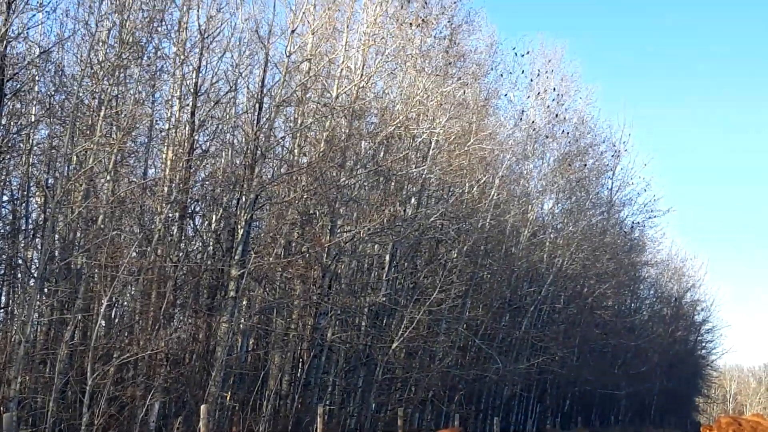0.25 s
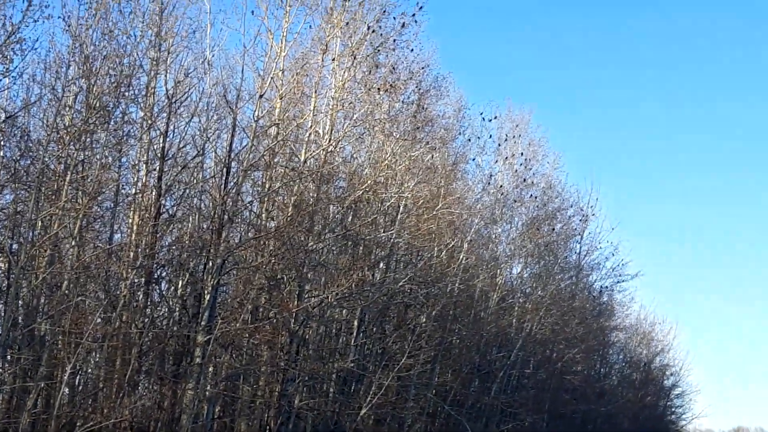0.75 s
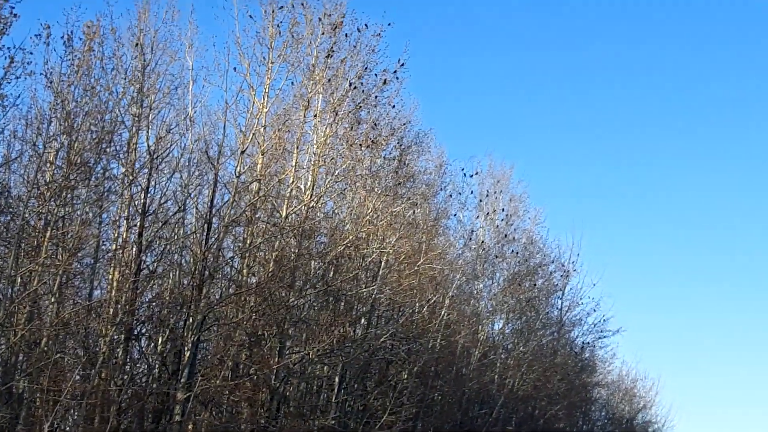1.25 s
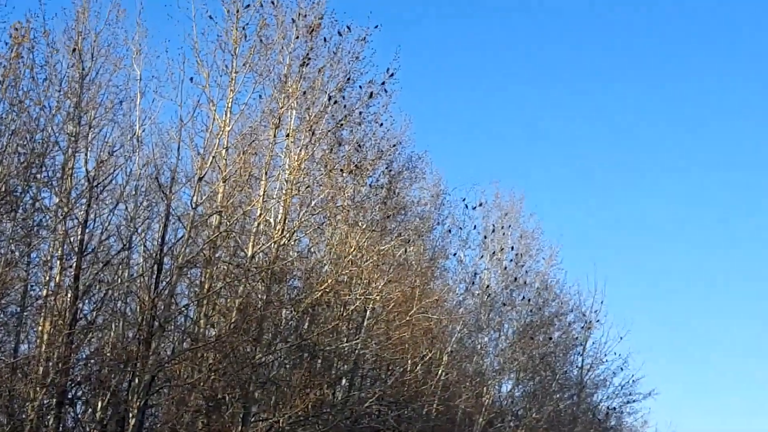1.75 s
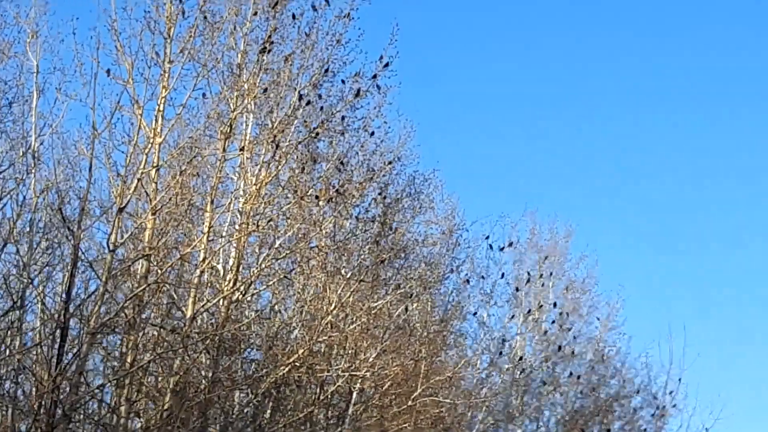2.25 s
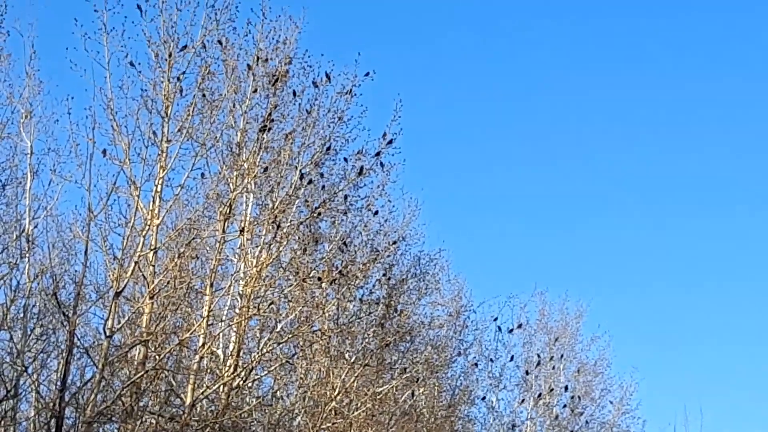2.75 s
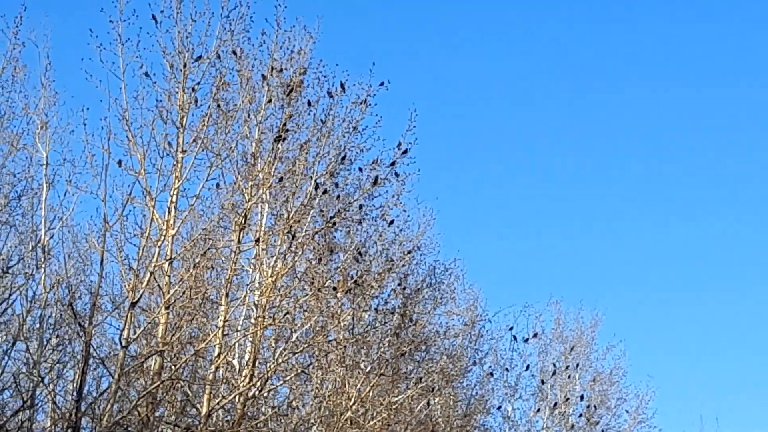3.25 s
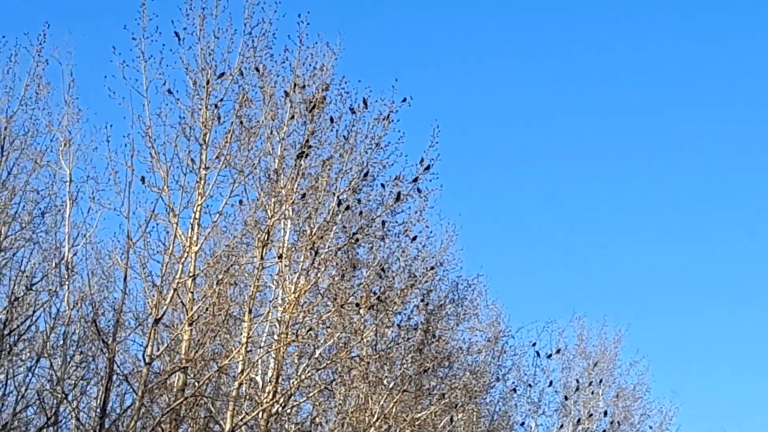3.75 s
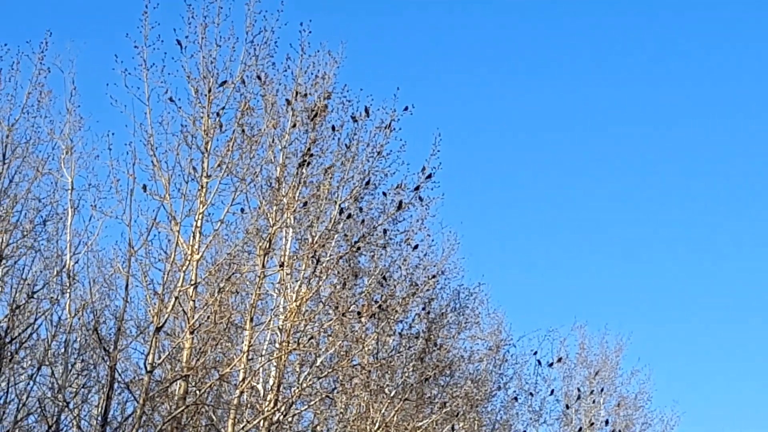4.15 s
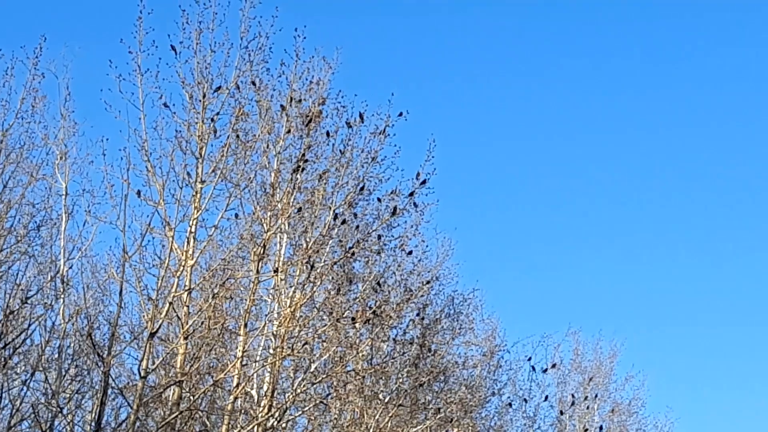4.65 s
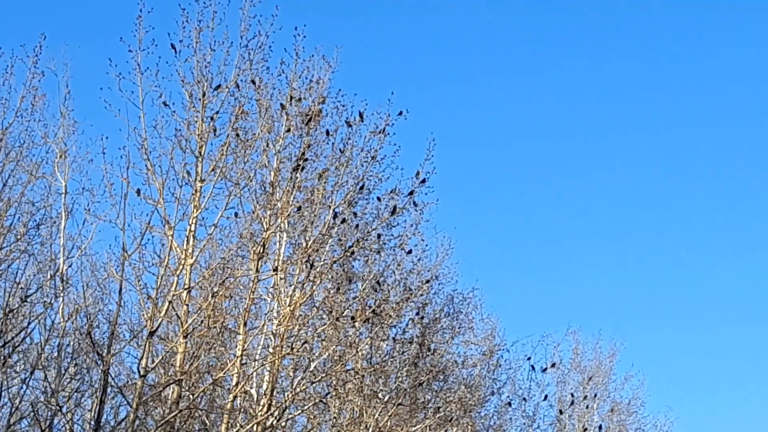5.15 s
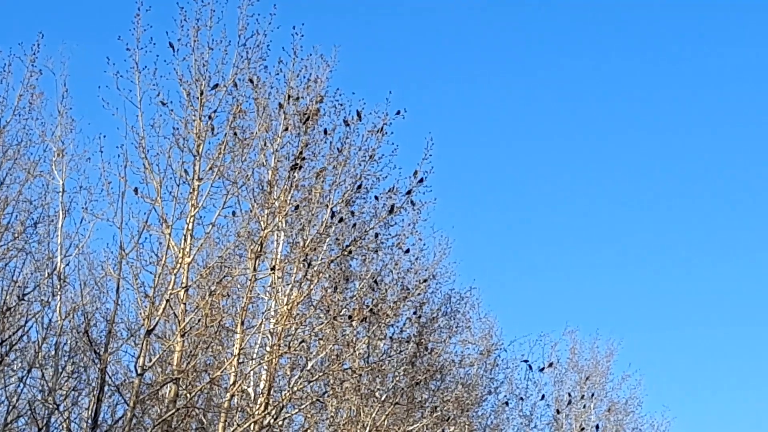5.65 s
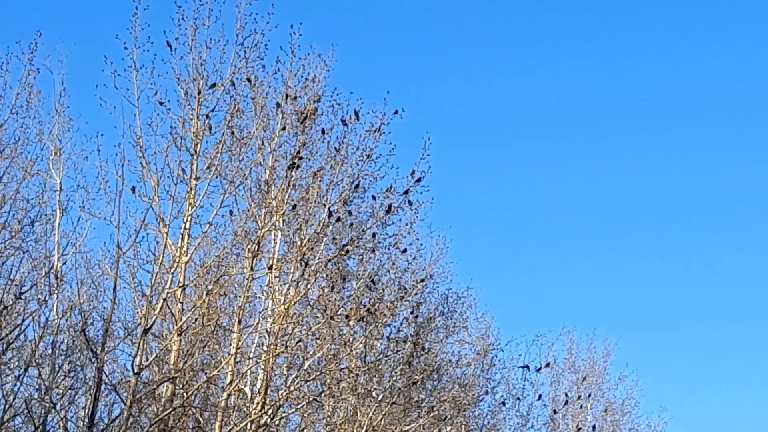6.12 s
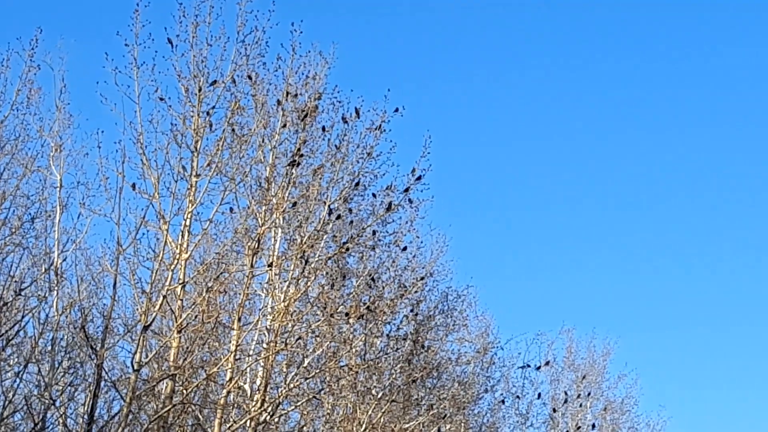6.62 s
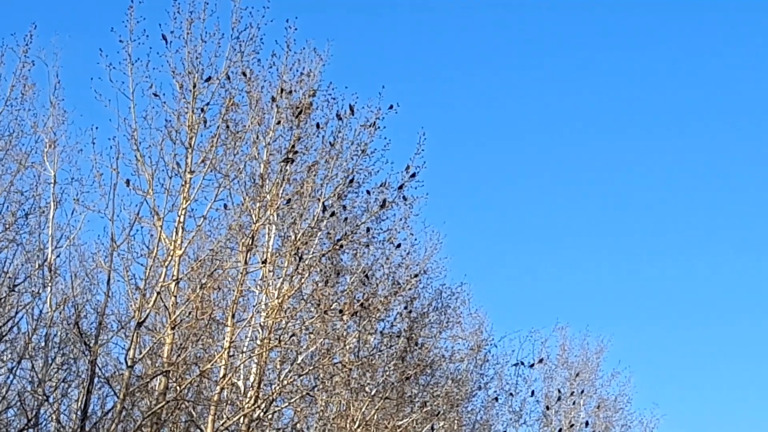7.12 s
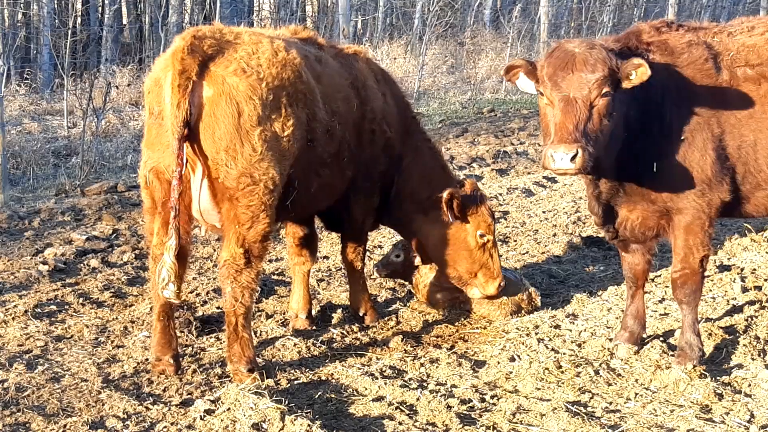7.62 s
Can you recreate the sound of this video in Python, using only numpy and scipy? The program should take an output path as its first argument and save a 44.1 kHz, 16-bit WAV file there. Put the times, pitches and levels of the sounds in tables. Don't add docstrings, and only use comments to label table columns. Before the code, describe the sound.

A large flock of blackbirds whistles, chips, chatters and trills from bare treetops, with light wind and small handling knocks, then dips into a quieter ending.

```python
import sys
import numpy as np
from scipy import signal
from scipy.fft import rfft, irfft
from scipy.io import wavfile
from scipy.ndimage import uniform_filter1d

SR = 44100
rng = np.random.default_rng(int(sys.argv[2]) if len(sys.argv) > 2 else 0)


def gain_from_db(level_db):
    decades = np.asarray(level_db, float) / 20
    return 10 ** decades


def master_out(mix):
    frames = np.transpose(np.atleast_2d(mix))
    ceiling = np.clip(frames, -1, 1)
    pcm = np.round(ceiling * 32767).astype(np.int16)
    wavfile.write(sys.argv[1], SR, pcm)


N = 347508


def evened(x):
    return x / np.sqrt(np.mean(x ** 2) + 1e-20)


def read(points, hz):
    f, value = np.transpose(points)
    return np.interp(np.log(hz + 1), np.log(f + 1), value)


def colour(x, points):
    gain = gain_from_db(read(points, np.fft.rfftfreq(x.shape[-1], 1 / SR)))
    return irfft(rfft(x) * gain, x.shape[-1])


def curve(rows, column, t):
    rows = np.asarray(rows)
    return np.interp(t, rows[:, 0], rows[:, column])


def add(mix, start_s, sound):
    part = mix[..., max(round(start_s * SR), 0):][..., :sound.shape[-1]]
    part += sound[..., :part.shape[-1]]


def wander(size, smooth_s):
    span = max(int(smooth_s * SR), 2)
    noise = rng.standard_normal(size + 4 * span)
    smooth = uniform_filter1d(uniform_filter1d(noise, span), span)
    return evened(smooth)[2 * span:-2 * span]


def sing(hz, db, taper, harsh_hz=0, flutter_db=3.2, waver_hz=18):
    size = len(hz)
    shaken_hz = hz + waver_hz * wander(size, .006) + harsh_hz * wander(size, .0006)
    turn = 2 * np.pi * np.cumsum(shaken_hz) / SR
    flutter = flutter_db * (1.67 * np.tanh(wander(size, .005)) - 0.81)
    flutter *= min(size / 4000, 1)
    shape = np.sqrt(2) * gain_from_db(db + flutter) * signal.windows.tukey(size, np.clip(taper, 0, 1))
    shift, tilt = rng.random(2)
    left_turn = turn + (hz.mean() - 4000) / 1200 + 3.2 * (shift - .5)
    return shape * np.array([gain_from_db(8 * (tilt - .5)) * np.sin(left_turn), np.sin(turn)])


# start_s, length_s, first_pitch_hz, last_pitch_hz, top_level_db
LEAD_WHISTLES = [(0.478, 0.27, 4344, 4430, -42.5), (1.428, 0.2, 4144, 4410, -37.5),
                 (1.541, 0.13, 4450, 4690, -38.5), (1.63, 0.105, 4480, 4550, -36),
                 (1.691, 0.2, 4613, 4610, -37), (2.188, 0.047, 4280, 4340, -37),
                 (2.258, 0.15, 4430, 4730, -47), (2.622, 0.12, 4580, 4510, -43.5),
                 (2.866, 0.13, 4330, 4475, -46), (3.176, 0.082, 4270, 4520, -33),
                 (3.255, .04, 4440, 4430, -39.5), (3.379, 0.17, 4400, 4273, -41.5),
                 (3.535, 0.18, 4430, 4506, -34.5), (4.051, 0.24, 4388, 4354, -34.5),
                 (4.723, 0.19, 4600, 4600, -52), (4.788, 0.23, 4370, 4615, -38),
                 (4.806, 0.24, 4145, 4460, -41.5), (4.965, 0.16, 4640, 4470, -42),
                 (5.342, .3, 4240, 4370, -39.5), (5.57, 0.19, 4490, 4676, -42.5),
                 (5.976, 0.073, 4280, 4485, -32.5), (6.048, 0.21, 4510, 4510, -41.5),
                 (6.904, 0.16, 4263, 4404, -41.5), (7.048, 0.099, 4414, 4480, -34),
                 (7.093, 0.2, 4260, 4470, -41), (7.173, 0.24, 4596, 4735, -40)]
# start_s, length_s, first_pitch_hz, last_pitch_hz, top_level_db
VOICE_SLURS = [(0.0, 0.052, 5370, 5000, -46), (0.522, 0.11, 1970, 1970, -51), (1.731, 0.2, 4200, 4200, -47),
               (6.478, 0.034, 4360, 4050, -41), (3.632, 0.093, 3570, 3640, -39.5),
               (3.721, 0.18, 4360, 4446, -53), (3.802, 0.17, 5300, 4900, -52),
               (4.563, 0.13, 3380, 3190, -51.5), (5.121, 0.068, 4900, 4300, -44.5),
               (5.268, 0.14, 5060, 4930, -46.5), (5.473, 0.071, 1650, 1640, -59),
               (5.598, 0.17, 4800, 4300, -52), (5.758, .02, 3700, 3620, -44),
               (6.8, 0.019, 4150, 3600, -47.5), (5.853, 0.11, 5200, 4720, -44),
               (5.926, 0.049, 3190, 2860, -50), (6.162, .16, 2290, 2220, -49),
               (6.315, 0.058, 3230, 3400, -45.5), (6.408, 0.05, 2035, 2120, -59.5),
               (6.548, 0.12, 5530, 5200, -51), (6.63, 0.15, 4900, 4900, -49.5),
               (6.641, .151, 5271, 5091, -42.5), (7.701, .151, 1591, 1591, -61.5),
               (3, .12, 4450, 4560, -49.5), (3.5, 0.085, 5700, 4900, -49), (1.61, .07, 6250, 6450, -56),
               (6.78, 0.028, 5080, 4700, -45), (5.5, .09, 2900, 2980, -54), (4.485, .04, 5300, 4800, -53),
               (4.74, 0.025, 5550, 6400, -57), (5.48, 0.078, 6350, 6200, -59), (5.5, .022, 4500, 4900, -43),
               (0.8, 0.12, 4420, 4400, -50), (4.5, 0.076, 4590, 4590, -50), (5, .07, 5150, 5300, -54)]
SWELL_DB, GLIDE_BEND, WHISTLE_EDGE = -5, .9, 0.12


def whistles():
    out = np.zeros((2, N))
    for start_s, length_s, first_hz, last_hz, db in [*LEAD_WHISTLES, *VOICE_SLURS]:
        u = np.linspace(0, 1, int(length_s * SR))
        glide_hz = first_hz + (last_hz - first_hz) * u ** GLIDE_BEND
        swell_db = SWELL_DB * (2 * u - 1) ** 2
        add(out, start_s, sing(glide_hz, db + swell_db, WHISTLE_EDGE, flutter_db=2.2))
    return out


# start_s, length_s, first_pitch_hz, last_pitch_hz, top_level_db
HUSKY_SLURS = [(2.04, .15, 4420, 4330, -42.5), (2.07, .15, 4680, 4630, -43.5), (2.12, .09, 3580, 3450, -46),
               (2.32, 0.036, 2294, 2100, -43.5), (2.36, 0.091, 2160, 2210, -54),
               (5.77, 0.1, 5270, 6240, -58), (5.859, 0.092, 6250, 6340, -52.5),
               (6.791, 0.12, 4900, 4850, -50), (7.455, 0.14, 2770, 2640, -61), (7.72, .16, 4620, 4650, -62),
               (7.74, .05, 4950, 5050, -60), (3.63, .05, 3300, 3050, -49), (3.69, 0.044, 2900, 3050, -51),
               (3.745, .03, 3820, 3430, -43), (6.531, .1, 3550, 3600, -51), (5.68, 0.052, 5450, 5300, -52),
               (5.74, .11, 2300, 2200, -57)]


def husky_slurs():
    out = np.zeros((2, N))
    for start_s, length_s, first_hz, last_hz, db in HUSKY_SLURS:
        glide_hz = np.linspace(first_hz, last_hz, int(length_s * SR))
        add(out, start_s, sing(glide_hz, db, 0.37, flutter_db=5, waver_hz=55))
    return out


# start_s, length_s, pitch_hz, level_db
HELD_NOTES = [(0.552, 0.12, 1680, -59), (0.728, 0.057, 1265, -56), (0.912, 0.056, 1850, -52.5),
              (1.038, 0.07, 3635, -48), (1.457, 0.099, 4470, -46), (1.595, 0.093, 5570, -54.5),
              (1.707, 0.052, 2354, -45.5), (1.823, 0.047, 3366, -41), (1.887, 0.064, 2376, -55),
              (1.968, 0.14, 4885, -44.5), (4.51, 0.11, 5500, -57.5), (2.178, 0.066, 2670, -51),
              (2.39, 0.067, 4500, -34), (3.299, 0.075, 4510, -33.5), (3.388, 0.1, 4770, -46),
              (3.461, 0.068, 4390, -38), (3.571, 0.06, 4250, -40), (3.709, 0.13, 4410, -45),
              (4.006, 0.075, 4300, -43.5), (4.542, 0.14, 4820, -48), (5.221, 0.029, 4700, -43.5),
              (5.377, 0.17, 4383, -38), (5.479, 0.085, 4480, -41.5), (5.668, 0.065, 3290, -48),
              (6.083, 0.071, 4330, -38.5), (1.3, 0.18, 4250, -52), (1.4, 0.079, 5250, -58),
              (1.369, .04, 1760, -56), (1.978, 0.022, 1400, -61), (2.58, .045, 5100, -54),
              (3.94, 0.06, 4300, -42.5), (4.148, 0.051, 1350, -64), (4.3, 0.068, 3030, -54.5),
              (4.419, .04, 3600, -53), (5.545, 0.073, 1720, -56.5), (7.05, 0.11, 4530, -34),
              (7.061, .08, 2150, -62.5), (7.14, 0.1, 2150, -67), (7.24, 0.063, 2660, -60),
              (.595, 0.028, 2500, -49), (0.328, 0.077, 3400, -46)]
# start_s, pitch_hz, level_db
BRIEF_PIPS = [(.015, 4760, -40.5), (.018, 5090, -41), (.05, 3400, -39), (0.468, 2530, -46),
              (.724, 3400, -40), (.742, 2098, -44.5), (1.018, 3466, -39), (1.6, 3970, -40),
              (1.602, 4620, -48), (1.868, 2350, -44.5), (2.453, 4800, -40.5), (2.538, 4120, -46),
              (2.572, 4970, -45), (2.628, 4600, -35.5), (3.061, 4750, -32), (3.204, 4690, -33.5),
              (3.405, 1920, -55), (3.535, 4060, -39), (4.568, 5520, -51), (4.707, 3600, -42),
              (4.747, 4290, -38.5), (5.3, 4366, -38), (5.335, 4440, -36), (6.89, 4930, -42.5),
              (6.94, 4220, -42), (7.625, 3570, -48.5), (.495, 4350, -47), (.64, 4380, -43),
              (2.245, 4400, -35.5), (2.165, 3550, -43.5), (3.185, 2650, -54), (4.305, 2600, -54),
              (3.775, 4750, -44), (4.44, 4700, -46), (4.06, 4900, -48), (6.69, 3230, -52), (7.2, 3500, -53),
              (7.13, 3800, -54.5), (4.888, 4400, -36.5), (7.3, 4660, -41), (5.895, 4330, -40.5),
              (6.11, 3500, -50), (5.858, 6420, -49), (7.82, 5300, -56), (1.24, 4600, -47), (2.3, 4800, -47)]
PIP_S = 0.026


def notes_and_pips():
    out = np.zeros((2, N))
    pips = [(start_s, PIP_S, hz, db) for start_s, hz, db in BRIEF_PIPS]
    for start_s, length_s, hz, db in [*HELD_NOTES, *pips]:
        add(out, start_s, sing(np.full(int(length_s * SR), float(hz)), db, 0.49))
    return out


BURST_T = np.arange(-.012, .012, 1 / SR)
# middle_s, middle_pitch_hz, level_db
FALLING_CHIPS = [(1.893, 4500, -38.5), (2.294, 4010, -42.5), (2.558, 4200, -38.5), (3.574, 3900, -39),
                 (3.722, 4160, -39), (3.99, 3880, -39.5), (4.234, 4010, -39), (4.311, 3850, -42.5),
                 (4.387, 3850, -37.5), (4.46, 4000, -37.5), (4.542, 3400, -48), (4.653, 3000, -42.5),
                 (4.712, 4150, -54), (4.73, 3500, -42), (4.848, 4150, -36), (5.199, 4570, -45),
                 (5.535, 3900, -49), (5.905, 3900, -41.5), (6.015, 3800, -44), (6.28, 3500, -49),
                 (7.4, 3700, -49.5)]
# middle_s, middle_pitch_hz, level_db
RISING_CLUCKS = [
    (.484, 2750, -41.5),
    (.565, 2790, -48),
    (2.216, 2985, -41),
    (2.415, 2590, -43),
    (2.746, 2900, -43),
    (5.062, 2810, -44.5),
]
CHIP_FALL_HZ_PER_S, CLUCK_STEP_HZ = -40000, 477


def chips_and_clucks():
    out = np.zeros((2, N))
    chip_sweep = CHIP_FALL_HZ_PER_S * BURST_T
    cluck_sweep = CLUCK_STEP_HZ / 2 * np.tanh(BURST_T / 0.0026)
    for calls, sweep in ((FALLING_CHIPS, chip_sweep), (RISING_CLUCKS, cluck_sweep)):
        for middle_s, hz, db in calls:
            call = sing(hz + sweep, db + .5 - 150 * BURST_T, 0.56, harsh_hz=80, waver_hz=30)
            add(out, middle_s + BURST_T[0], call)
    return out


# middle_s, middle_pitch_hz, spread_hz, level_db
HARSH_CHACKS = [(.035, 6200, 910, -56), (.315, 2730, 344, -47.5), (1.176, 4700, 298, -46.5),
                (1.215, 4490, 298, -40), (1.333, 2800, 220, -43), (1.75, 3690, 490, -46),
                (1.82, 6000, 503, -47), (3.787, 1697, 130, -46.5), (6.853, 3490, 300, -41.5),
                (7.05, 3500, 246, -47.5), (1.555, 1610, 200, -53), (5.71, 5200, 250, -46.5),
                (6.965, 4900, 450, -48.5), (5.445, 3480, 350, -51), (5.49, 3297, 350, -52.5),
                (5.53, 3490, 350, -51), (1.74, 3700, 350, -50), (1.8, 6300, 300, -56),
                (6.594, 3550, 257, -49), (6.701, 3620, 700, -59), (7.748, 3900, 400, -52),
                (7.84, 4000, 300, -49.5)]


def chacks():
    out = np.zeros((2, N))
    for middle_s, hz, spread_hz, db in HARSH_CHACKS:
        call = sing(hz + 0 * BURST_T, db - 200 * BURST_T, 0.64, harsh_hz=spread_hz)
        add(out, middle_s + BURST_T[0], call)
    return out


# start_s, length_s, buzz_pitch_hz, throbs_per_s, roughness_0_to_1, level_db
BUZZ_TRILLS = [
    (0.063, 0.43, 453.4, 31, 0.64, -48),
    (0.761, 0.674, 456, 47, 0.88, -50),
    (6.45, .34, 440, 27.7, 0.9, -57),
    (7.455, 0.082, 456, 39, 0.85, -59),
    (7.719, 0.14, 456, 35, 1.05, -59.5),
]
# pitch_hz, level_db
THROAT = [(2200, -40), (2750, 0), (3200, 4), (3660, 9), (4100, -5), (4570, -6), (5030, 0.5), (5500, -47)]


def trills():
    out = np.zeros((2, N))
    for start_s, length_s, hz, throbs, rough, db in BUZZ_TRILLS:
        t = np.arange(int(length_s * SR)) / SR
        turn = 2 * np.pi * np.cumsum(hz * (1 + 0.00563 * wander(len(t), 0.0081))) / SR
        buzz = evened(sum(np.cos(k * turn + k * k) for k in range(5, 13)))
        drive = (1 - rough) * buzz + rough * rng.standard_normal(len(t))
        throb = .3 + .7 * np.sin(np.pi * throbs * t + .7 * wander(len(t), .03)) ** 2
        throb *= signal.windows.tukey(len(t), .3)
        level = gain_from_db(np.array([[db + 5.0], [db]]))
        add(out, start_s, level * evened(colour(drive, THROAT) * throb))
    return out


def trees(x, t60=0.42):
    t = np.arange(SR // 2) / SR
    struck = rng.random((2, len(t))) < .05
    taps = rng.standard_normal((2, len(t))) * struck * gain_from_db(-60 * t / t60) * (t > .004)
    taps /= np.linalg.norm(taps, axis=1, keepdims=True)
    return signal.fftconvolve(x, taps, axes=1)[:, :N]


def far_call(pitch, kind, long, size, glide):
    hz = 1200 + 6000 * pitch
    db = (1 + 5 * min(pitch * 2, 1)) * size - 6 * max(1 - 5 * pitch, 0)
    if kind < .4 and hz < 5300:
        t = np.arange(int((0.02 + .06 * long ** 2) * SR)) / SR
        favourite_hz = 2150 if hz < 2900 else 4450
        glide_hz = .6 * hz + .4 * favourite_hz + 3000 * (glide - .5) * t
        return sing(glide_hz, db - 6, .7, waver_hz=45)
    if kind < .68:
        t = np.arange(int((.01 + .012 * long) * SR)) / SR
        sweep = 100000 * (glide - .75) * (t - t.mean())
        return sing(hz + sweep, db - 5.0, 0.58, harsh_hz=50)
    t = np.arange(int((.008 + .022 * long) * SR)) / SR
    return sing(hz + 0 * t, db - 3.0, 0.4, harsh_hz=150 + 300 * glide)


# start_s, level_db, low_voices_db (over the rest)
FLOCK_LEVEL = [(0.0, -48.5, 0), (0.83, -50, 5), (1.51, -47.5, 0), (1.65, -47, 1.5), (2.98, -48.5, 0.5),
               (3.51, -45.5, -4), (3.82, -50, 3.5), (4.08, -48, -0.5), (4.56, -48.5, -1),
               (4.83, -47.5, -2.5), (5.24, -53, 0), (5.46, -48.5, 1.5), (6.1, -49, -2.5),
               (6.34, -54.5, -0.5), (7.2, -53, -1.5), (7.44, -59.5, -1), (7.68, -60, -1.5),
               (7.88, -53.5, -1)]
# pitch_hz, level_db (per Hz)
FLOCK_SPECTRUM = [(590, -38.5), (1050, -33), (1400, -17.5), (1750, -18.5), (2090, -10.5), (2430, -14.5),
                  (2820, -13), (3100, -9), (4390, -3.5), (4960, -7.5), (5500, -19), (6610, -21),
                  (7330, -29), (8000, -32), (10400, -57.5), (17600, -120)]


def far_flock(count=2200):
    chatter = np.zeros((2, N))
    for k, (when, *voice) in enumerate(rng.random((count, 6))):
        start_s = (k + 40 * when - 30) / count * N / SR
        add(chatter, start_s, far_call(*voice))
    chatter = evened(chatter)
    blur = gain_from_db(1) * rng.standard_normal((2, N)) + gain_from_db(-2) * trees(chatter)
    flock = evened(colour(chatter + blur, FLOCK_SPECTRUM))
    low = colour(flock, [(2300, 0.5), (3000, -20.5)])
    t = np.arange(N) / SR
    low_gain = gain_from_db(curve(FLOCK_LEVEL, 2, t)) - 1
    return gain_from_db(curve(FLOCK_LEVEL, 1, t) + 3.5) * (flock + low_gain * low)


# start_s, peak_db, pitch_hz, length_s, click_share_0_to_1
BODY_KNOCKS = [(0.358, -58, 402, 0.082, .05), (0.443, -61.5, 450, 0.12, .05), (1.31, -58, 218, 0.026, 1),
               (1.352, -67.5, 372, 0.2, 0.2), (1.556, -54, 390, 0.02, 1), (1.627, -59.5, 352, 0.022, 1),
               (2.013, -52, 135, 0.026, 0.1), (2.749, -65, 330, 0.02, 0.5), (3.779, -57, 334, 0.028, 0.7),
               (3.815, -57, 407, 0.062, 1), (3.364, -65, 350, 0.017, .3), (3.49, -65, 307, 0.019, .3),
               (4.028, -64.5, 196, 0.035, .1), (4.245, -69, 202, 0.037, .1), (3.916, -61, 280, 0.014, 0.2),
               (3.985, -62, 393, 0.043, 0.3), (6.144, -56.5, 138, 0.016, 0), (6.773, -63.5, 754, 0.026, .1)]


def knocks():
    out = np.zeros(N)
    for start_s, db, hz, length_s, click in BODY_KNOCKS:
        t = np.arange(int(2.5 * length_s * SR)) / SR
        body = [(.5 * hz, -34), (0.85 * hz, -5), (hz, 0), (1.14 * hz, -6), (1.8 * hz, -20), (5 * hz, -45)]
        ring = evened(colour(rng.standard_normal(len(t)), body))
        ring *= 0.45 * (1 - np.exp(-t / 0.0026)) * np.exp(-(t / length_s) ** 2)
        wide = [(80, -37), (400, 29), (1000, 0), (1700, -4), (2600, -12), (12000, -21)]
        tick = evened(colour(rng.standard_normal(len(t)), wide)) * np.exp(-t / .004)
        add(out, start_s, gain_from_db(db) * (ring + .6 * click * tick))
    return np.array([gain_from_db(2.5) * np.roll(out, 12), gain_from_db(6.0) * out])


# middle_s, length_s, middle_pitch_hz, level_db
SLEEVE_RUSTLES = [(0, 0.11, 14000, -72), (0.353, 0.15, 11200, -74), (1.012, 0.21, 15100, -79),
                  (1.279, 0.19, 10700, -73), (1.6, 0.073, 8600, -69), (2.203, 0.16, 10000, -74.5),
                  (3.164, 0.68, 11000, -72.5), (3.764, 0.16, 6800, -65.5), (4.895, 0.38, 10500, -77.5),
                  (5.692, 0.37, 15000, -81.5), (6.02, 0.062, 12100, -74), (3.045, .012, 12000, -70),
                  (3.983, 0.023, 9000, -71)]


def rustles():
    out = np.zeros((2, N))
    for middle_s, length_s, hz, db in SLEEVE_RUSTLES:
        size = int(length_s * SR)
        cloth = rng.standard_normal((3, size))
        cloth = cloth[:2] + .5 * cloth[2]
        cloth = colour(cloth, [(0.26 * hz, -18), (0.47 * hz, -6), (hz, 0), (1.27 * hz, -8)])
        grain = gain_from_db(db + 4.0 + 2.55 * wander(size, 0.0046))
        add(out, middle_s - length_s / 2, grain * evened(cloth) * np.hanning(size))
    return out


# start_s, hiss_db, wind_rumble_db
AIR_LEVEL = [
    (0.0, -73.5, -70.5),
    (1.31, -74.5, -66),
    (1.95, -74.5, -71),
    (2.0, -73.5, -63),
    (2.81, -76.5, -70.5),
    (3.07, -74, -68.5),
    (4.61, -77, -74),
    (5.64, -76, -72),
    (7.88, -80.5, -75.5),
]
# pitch_hz, level_db (per Hz)
HISS_SPECTRUM = [(200, 6), (500, 4), (1000, 2), (3000, -3), (7000, -1), (10000, 0), (16000, 0)]
# pitch_hz, level_db (per Hz)
RUMBLE_SPECTRUM = [(12, -62), (20, -57), (27, -32), (36, -38), (49, -2.5), (123, 4.5), (187, -5.5),
                   (500, -21), (650, -47), (1100, -120)]


def air():
    t = np.arange(N) / SR
    hiss = rng.standard_normal((3, N))
    hiss = hiss[:2] + 0.53 * colour(hiss[2], [(900, -4.0), (2000, -18)])
    hiss = colour(hiss, HISS_SPECTRUM) * gain_from_db(curve(AIR_LEVEL, 1, t) + 7.0)
    gusts = rng.standard_normal((3, N))
    rumble = evened(colour(gusts[:2] + 0.95 * gusts[2], RUMBLE_SPECTRUM))
    rumble *= gain_from_db(2.77 * wander(N, 0.018) + curve(AIR_LEVEL, 2, t) - 1.5)
    return hiss + rumble * gain_from_db(np.array([[-1.4], [1.4]]))


CUT_S, FADE_S = 7.436, .034
# pitch_hz, level_db
BODY_SHADOW = [(900, 1.5), (2000, -3), (3300, -19.5), (4500, -16.5), (6000, -4.5), (8000, -5)]
# pitch_hz, level_db
SECOND_SHOT_COLOUR = [(150, 1), (400, 1.5), (5100, 0), (5550, -14), (6000, -0.5)]


def scene():
    cut = round(CUT_S * SR)
    near = whistles() + husky_slurs() + notes_and_pips() + chips_and_clucks() + chacks() + trills()
    shots = near[:, :cut], near[:, cut:]
    echoes = np.hstack([trees(shot)[:, :shot.shape[1]] for shot in shots])
    birds = gain_from_db(-.5) * near + gain_from_db(-10) * echoes + far_flock()
    birds[0] = colour(birds[0], BODY_SHADOW)
    heard = birds + air() + rustles() + knocks()
    return np.hstack([heard[:, :cut], colour(heard[:, cut:], SECOND_SHOT_COLOUR)])


# pitch_hz, level_db
GATE_THRESHOLD = [(7000, -3.2), (9500, -4.4), (16000, -7.5)]


def gate(x):
    hz, _, z = signal.stft(x, SR, nperseg=2048)
    power = uniform_filter1d((abs(z) ** 2).mean(0), size=7, axis=0)
    level = 10 * np.log10(power + 1e-20)
    usual = uniform_filter1d(level, size=20, axis=1)
    threshold = read(GATE_THRESHOLD, hz)[:, None] / 2
    faint = (level - usual < threshold) & (hz[:, None] > GATE_THRESHOLD[0][0])
    muted = uniform_filter1d(1. * faint, size=5, axis=0) > .1
    return signal.istft(z * ~muted, SR, nperseg=2048)[1][:, :N]


def band_limit(x):
    return signal.sosfilt(signal.butter(12, 15770, fs=SR, output="sos"), x)


def record(dry):
    fade = np.clip(abs(np.arange(N) / SR - CUT_S) / FADE_S, 0, 1) ** 1.4
    return band_limit(gate(dry) * fade)


dry = scene()
out = record(dry)
master_out(out)
```